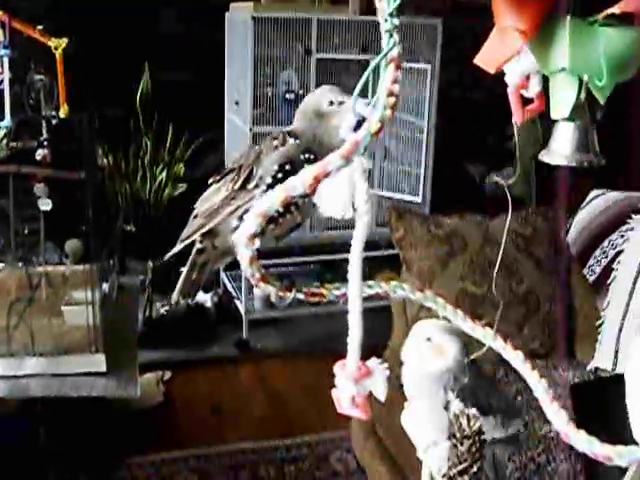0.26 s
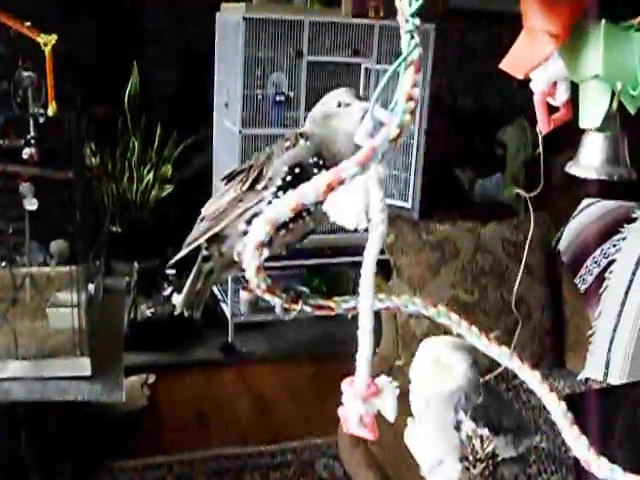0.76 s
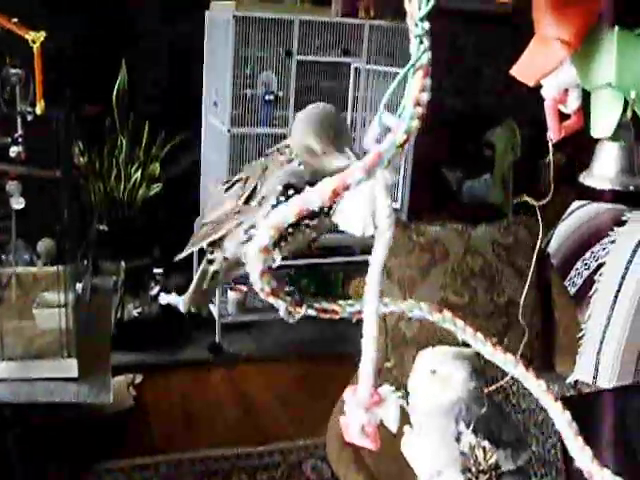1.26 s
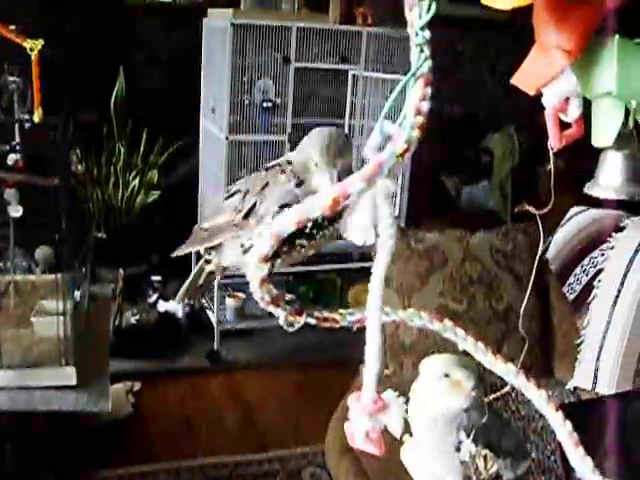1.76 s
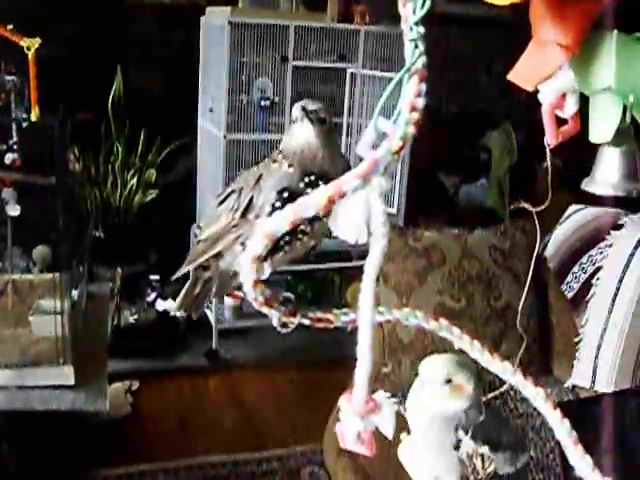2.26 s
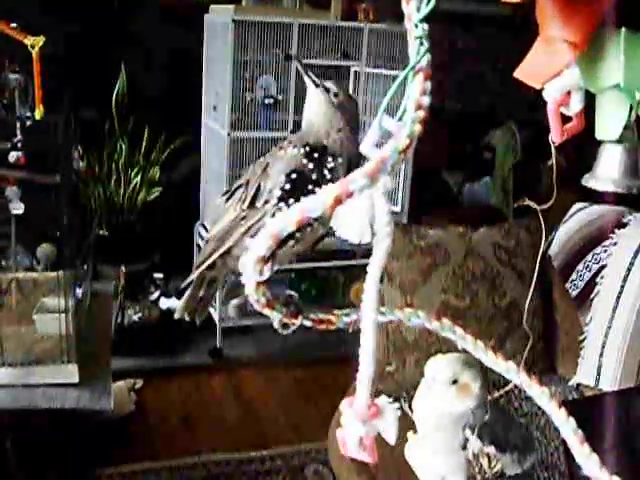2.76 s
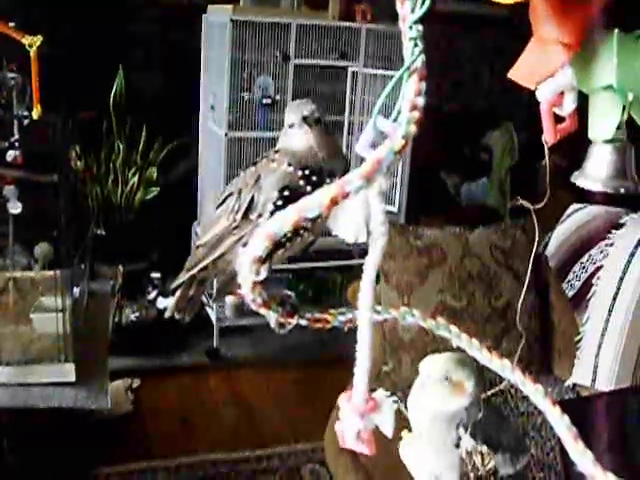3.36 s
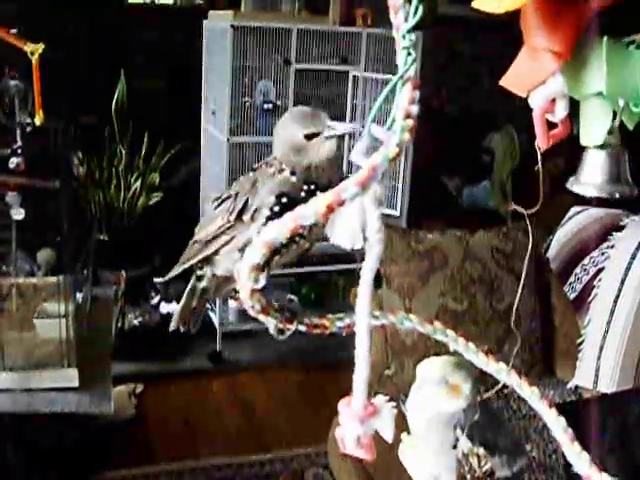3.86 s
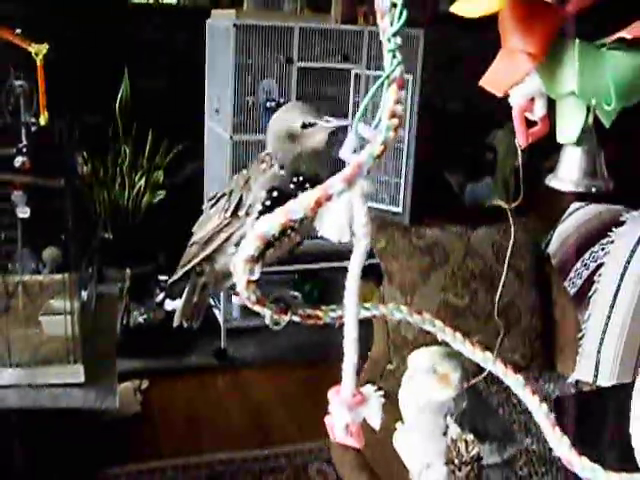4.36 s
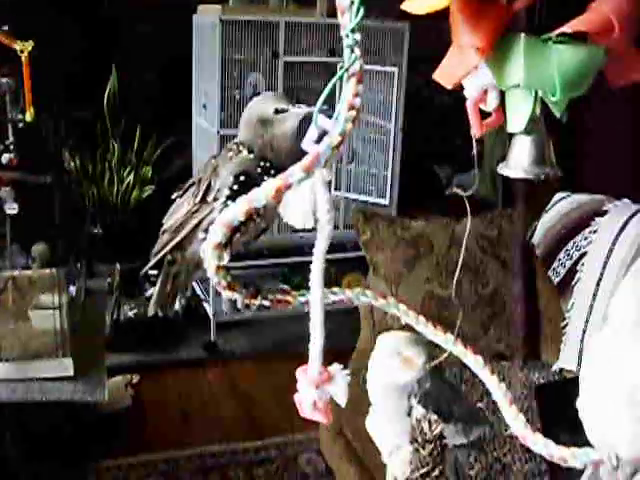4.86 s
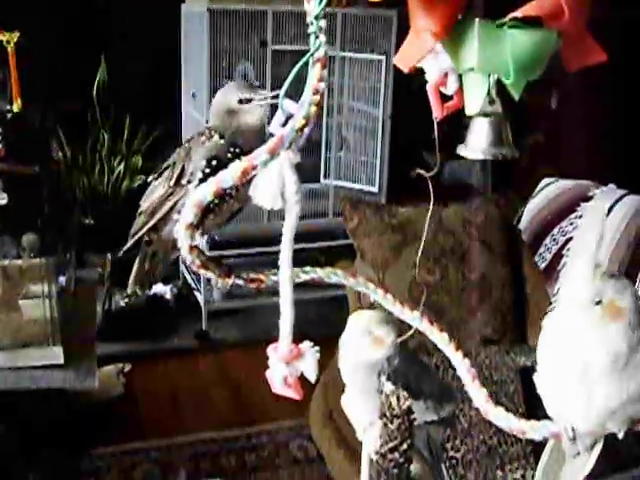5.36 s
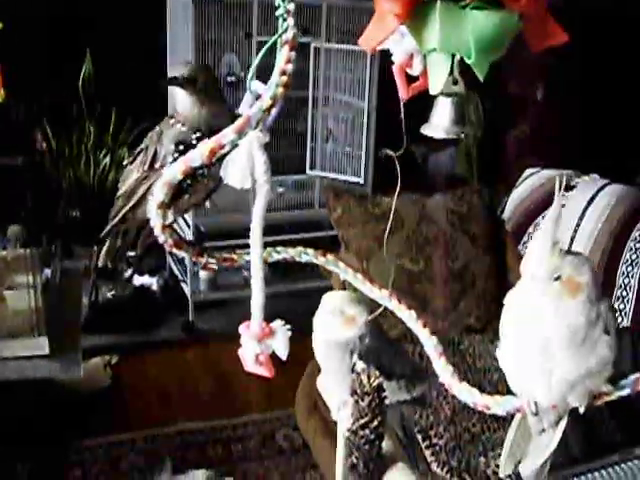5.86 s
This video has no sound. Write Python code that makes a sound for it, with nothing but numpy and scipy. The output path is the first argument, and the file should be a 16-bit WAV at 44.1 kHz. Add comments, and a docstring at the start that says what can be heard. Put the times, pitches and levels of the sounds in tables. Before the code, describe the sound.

In a quiet room, a pet bird gives reedy gliding chirps, thin whistles, scratchy chips and a soft mutter, pausing between bursts.

```python
"""Arched, reedy syllables of a pet starling, then high whistles, dry double chips and a soft mutter.
Each note is a gliding syrinx tone plus overtones, shaped by throat and beak; fast pitch scatter and
leaking air make it hoarse. A quiet living room answers briefly; under it lie one faint ringing tone
near 2.2 kHz, a few soft rustles, a low hush and a thin electronic whine."""
import sys
import numpy as np
from scipy import signal
from scipy.fft import rfft, irfft
from scipy.io import wavfile
from scipy.ndimage import uniform_filter1d

SR = 44100
rng = np.random.default_rng(int(sys.argv[2]) if len(sys.argv) > 2 else 0)


def digitize_waveform(pressure):
    """Quantize a signal to 16-bit integers and store it at the path in sys.argv[1].

    Rows of a 2-D input are taken as channels; values are limited to [-1, 1].
    """
    field = np.atleast_2d(pressure).T
    bounded = np.clip(field, -1, 1)
    quanta = np.round(bounded * 32767).astype(np.int16)
    wavfile.write(sys.argv[1], SR, quanta)


N = 269451
TIME = np.arange(N) / SR

# reedy syllables, one curve each: time_s, pitch_hz, level_db, upper_overtones_db
SYLLABLES = [
    [(0, 2060, -41, -65), (.012, 1910, -58, -91), (.035, 1855, -63.5, -86), (.1, 1950, -73, -98)],
    [(0.172, 958, -62, -89), (0.184, 1078, -50, -75), (0.194, 1126, -54.5, -91), (0.206, 1522, -48, -83),
     (0.25, 1834, -40.5, -65), (0.304, 1920, -39, -76), (0.324, 2120, -43.5, -84),
     (0.344, 2100, -42.5, -90), (0.37, 2370, -46.5, -71), (0.394, 2200, -43, -71),
     (0.408, 1820, -42.5, -72), (0.438, 1498, -48, -73), (0.502, 1387, -47.5, -73), (0.508, 1345, -47, -60),
     (0.522, 910, -53, -75)],
    [(0.662, 990, -56.5, -70), (0.68, 1380, -48.5, -63), (0.702, 1602, -37, -56), (0.724, 1617, -56, -67.5),
     (0.74, 1810, -49, -61), (0.79, 2165, -41, -65), (0.802, 2456, -35.5, -63), (0.814, 2422, -41.5, -69),
     (0.852, 2894, -36, -56), (0.88, 2682, -39.5, -66), (0.914, 2758, -43, -63), (0.932, 2796, -44, -71),
     (0.96, 2436, -41, -63), (0.966, 2205, -40.5, -68), (0.979, 1543, -53, -73)],
    [(1.348, 1360, -60.5, -79), (1.39, 1834, -44, -62.5), (1.418, 1926, -38.5, -61),
     (1.436, 2584, -39, -81), (1.46, 2630, -41, -63), (1.468, 2764, -37.5, -67), (1.5, 2930, -40.5, -66),
     (1.516, 2865, -38.5, -71), (1.526, 2815, -51, -80), (1.545, 2757, -45, -74)],
    [(3.888, 1332, -66, -73), (3.91, 1840, -46.5, -57), (3.928, 1940, -39, -48.5),
     (3.956, 1600, -51.5, -72), (4.004, 1572, -41, -45), (4.016, 2140, -37.5, -55), (4.026, 2683, -43, -80),
     (4.046, 2180, -44, -76), (4.058, 2350, -40, -72), (4.07, 1817, -41.5, -78), (4.08, 1676, -40.5, -58),
     (4.1, 1619, -41.5, -58.5), (4.128, 1672, -40.5, -58.5), (4.168, 1550, -46.5, -68.5),
     (4.18, 1362, -50.5, -72), (4.202, 1458, -46.5, -67), (4.21, 1420, -52.5, -77), (4.228, 1193, -53, -78)],
    [(5.403, 1243, -55, -82), (5.411, 1450, -50, -64), (5.423, 1446, -45.5, -53), (5.437, 1750, -40, -54),
     (5.499, 1845, -38.5, -55.5), (5.519, 2185, -41, -58), (5.535, 2822, -33.5, -68),
     (5.555, 2927, -36, -68), (5.577, 2723, -34, -64.5), (5.599, 2396, -41.5, -82), (5.609, 2087, -37, -64),
     (5.623, 1580, -51.5, -76)],
]
# throat response to overtones: freq_hz, gain_db
THROAT = [(3000, 25), (4700, 5), (6200, -2), (7700, -1), (9300, -1), (10700, -19), (11800, -13.5),
          (13000, -14), (15500, -27)]
# spectrum of air through a loosely closed syrinx: freq_hz, gain_db
AIR = [(600, -7), (1500, 9), (3500, 3), (6000, 7), (9300, -54), (10800, -7), (12000, -25), (15500, -31)]


def starling(waver=0.012, clear=0.0074, hoarse=0.058, scratch=0.055, throb=2.3, shimmer_db=2.5):
    """Pitch and level waver; fast scatter and leaking air make the voice hoarse."""
    # per syllable: pure_above_hz (rising), reedy_below_hz (falling), reedy_octave_db, pure_octave_db,
    # gape_hz
    voicings = [(1500, 1700, 0, -30, 14000), (1390, 1490, 9, -24, 11000), (1990, 1800, 6, -29, 12000),
                (2065, 1700, 1, -26, 9500), (2480, 1930, -0.5, -21, 11500), (2330, 1700, 6, -27.5, 16000)]
    # rasps: centre_s, half_length_s, scatter_ratio
    rasps = [(0.429, 0.011, 0.031), (0.843, 0.0051, 0.025), (0.903, 0.0051, 0.07), (4.026, 0.027, 0.021),
             (4.111, 0.0019, 0.019), (5.512, 0.011, 0.023), (6.065, 0.08, 0.041)]
    slow = waver * wobble(rate_hz=194)
    fast = wobble(rate_hz=3100)
    shake = trills()
    rasp = sum(depth * bump(centre_s, half_s) for centre_s, half_s, depth in rasps)
    scatter = slow + shake + (clear + rasp) * fast
    song = reedy(SYLLABLES, voicings, scatter, gain_db=-0.5, upper_gain_db=-0.5)
    song += doublings(scatter) + whistles(scatter)
    song *= (1 + throb * shake) * from_db(shimmer_db * wobble(rate_hz=84))
    gravel = slow + hoarse * fast
    mutter = reedy(*grunts(), gravel, gain_db=3.5) + twitter(gravel)
    mutter = beak(mutter + air(mutter, gain_db=-10), cutoff_hz=19000)
    chip = chips(slow + scratch * fast)
    chip = beak(chip + air(chip, gain_db=-17), cutoff_hz=12400)
    return song + mutter + chip + tick()


def syrinx(pitch_hz, scatter, gains):
    """Harmonics of one vibrating membrane; scatter bends its pitch."""
    phase = 2 * np.pi * np.cumsum(pitch_hz * (1 + scatter)) / SR
    return np.sqrt(2) * sum(gain * (k * pitch_hz < SR / 2) * np.sin(k * phase)
                            for k, gain in enumerate(gains, 1))


def reedy(syllables, voicings, scatter, gain_db, upper_gain_db=0, harmonics=10, gape_order=7):
    """The throat favours fundamental or octave; a wider beak lets out higher overtones."""
    out = np.zeros(N)
    for rows, (*voicing, gape_hz) in zip(syllables, voicings):
        at, gate, (pitch_hz, effort_db, upper_db) = note(rows)
        first_db, octave_db = effort_db + register(pitch_hz, effort_db, *voicing)
        jump, catch_db = catches(TIME[at])
        upper_hz = np.arange(3, harmonics + 1)[:, None] * pitch_hz * jump
        upper = from_db(at_hz(THROAT, upper_hz)) / np.sqrt(1 + (upper_hz / gape_hz) ** (2 * gape_order))
        upper *= from_db(upper_db + upper_gain_db) / np.linalg.norm(upper, axis=0)
        gains = [from_db(first_db), from_db(octave_db), *upper]
        out[at] += gate * from_db(catch_db) * syrinx(pitch_hz * jump, scatter[at], gains)
    return from_db(gain_db) * out


def register(pitch_hz, effort_db, up_hz, down_hz, reedy_db, pure_db, width_hz=113, octave_per_db=0.24):
    """Shares of fundamental and octave in dB: reedy when low, nearly pure when high."""
    # throat lift of a reedy octave: freq_hz, gain_db
    octave_lift = [(2000, -6), (2900, 4), (3300, 1.5), (3700, -2), (4400, -2)]
    rising = np.arange(len(pitch_hz)) <= np.argmax(pitch_hz)
    break_hz = np.where(rising, up_hz, down_hz)
    pure = .5 + .5 * np.tanh((pitch_hz - break_hz) / (2 * width_hz))
    octave_db = (reedy_db + at_hz(octave_lift, 2 * pitch_hz)) * (1 - pure) + pure_db * pure
    octave_db += octave_per_db * (effort_db - effort_db.mean())
    first_db = -10 * np.log10(1 + from_db(octave_db) ** 2)
    return np.array([first_db, first_db + octave_db])


def trills():
    """Fast pitch swings, each swelling in and out."""
    # trills: start_s, end_s, rate_hz, swing_ratio
    spans = [(0.209, 0.31, 72.4, 0.016), (0.428, 0.523, 70.4, 0.038), (0.752, .84, 99.7, 0.02),
             (1.158, 1.248, 216, 0.046), (3.922, 3.953, 102, 0.011), (3.963, 3.998, 61, 0.03),
             (4.107, 4.161, 70.5, 0.04), (4.163, 4.225, 67.4, 0.14), (5.443, 5.52, 90, 0.015)]
    out = np.zeros(N)
    for start_s, end_s, rate_hz, swing in spans:
        swell = np.sqrt(np.clip(4 * (TIME - start_s) * (end_s - TIME) / (end_s - start_s) ** 2, 0, 1))
        out += swing * swell * np.sin(2 * np.pi * rate_hz * (TIME - start_s))
    return out


def catches(time_s):
    """The voice catches for an instant: pitch factor and gain in dB."""
    # catches: centre_s, half_length_s, jump_ratio, gain_db
    events = [(0.275, 0.0059, -.03, -18), (0.306, 0.0061, -.04, -8), (0.767, .005, -.02, -7),
              (0.779, 0.0042, 0.017, 2.5), (0.9, 0.0061, 0, -4), (1.457, 0.0042, -0.017, -11),
              (4.101, 0.00351, 0.237, 3.5), (5.422, 0.0048, -0.023, 1.5), (5.509, 0.0065, 0, -8.5)]
    centre_s, half_s, jump, gain_db = np.transpose(events)
    bumps = np.exp(-np.minimum(((time_s[:, None] - centre_s) / half_s) ** 2, 20))
    return 1 + bumps @ jump, bumps @ gain_db


def doublings(scatter):
    """The membrane skips into half pitch, adding tones between a syllable's harmonics."""
    # period doublings: centre_s, length_s, level_db
    skips = [(0.846, 0.0037, -53), (0.908, 0.032, -56.5)]
    # added tones: pitch_multiple, gain_db
    half_tones = [(1.5, -7), (2.5, 0), (3.5, -3)]
    out = np.zeros(N)
    times_s, pitches_hz = np.concatenate(SYLLABLES).T[:2]
    pitch_hz = np.interp(TIME, times_s, pitches_hz)
    for centre_s, length_s, level_db in skips:
        at, gate, (swell_db,) = note(np.transpose(arch(centre_s, length_s, edge_db=-5)))
        for multiple, gain_db in half_tones:
            gain = from_db(level_db + swell_db + gain_db)
            out[at] += gate * syrinx(multiple * pitch_hz[at], scatter[at], [gain])
    return out


def whistles(scatter, gain_db=-1.5, octave_db=-8, third_db=-23, full_effort_db=-41):
    """Nearly pure high tones; the octave shows when pushed and where the throat passes it."""
    # whistles, one curve each: time_s, pitch_hz, level_db
    curves = [
        [(1.061, 7782, -76), (1.067, 7098, -52.5), (1.077, 5900, -50), (1.105, 5240, -44.5), (1.115, 4510, -43),
         (1.139, 4470, -39.5), (1.149, 4274, -43), (1.167, 4700, -40), (1.199, 6000, -36.5),
         (1.227, 6357, -37.5), (1.245, 6182, -50), (1.255, 5420, -51), (1.263, 4390, -42), (1.268, 4400, -61)],
        [(4.852, 8040, -68), (4.872, 8500, -54.5), (4.89, 7820, -58), (4.912, 7420, -65), (4.935, 7870, -52),
         (4.952, 5950, -75), (4.967, 5090, -67)],
    ]
    out = np.zeros(N)
    for rows in curves + slurs():
        at, gate, (pitch_hz, first_db) = note(rows)
        slack_db = np.minimum(first_db - full_effort_db, 0)
        second_db = first_db + octave_db + at_hz(THROAT, 2 * pitch_hz) + slack_db
        gains = from_db([first_db, second_db, second_db + third_db])
        out[at] += gate * syrinx(pitch_hz, scatter[at], gains)
    return from_db(gain_db) * out


def slurs():
    """Curves of short glides, some from the other side of the syrinx."""
    # slurs: centre_s, length_s, start_hz, end_hz, level_db
    glides = [(0.856, 0.018, 5200, 3380, -54), (0.9, .018, 2994, 4100, -49), (4.88, 0.03, 5370, 4840, -69),
              (6.028, 0.016, 4000, 4460, -76), (6.05, 0.022, 6110, 6950, -53.5),
              (6.097, 0.041, 5330, 7000, -60)]
    curves = []
    for centre_s, length_s, start_hz, end_hz, level_db in glides:
        times_s, swell_db = arch(centre_s, length_s, edge_db=-1.5)
        curves.append(np.transpose([times_s, np.geomspace(start_hz, end_hz, 3), level_db + swell_db]))
    return curves


def chips(scatter, harmonics_db=(0, -18, -32, -35)):
    """Pairs of quick scratchy notes, each flicking upward."""
    # the two notes, one curve each: offset_s, pitch_hz, level_db
    curves = [
        [(0, 2680, -60), (.006, 3167, -55.5), (.011, 3690, -55), (.015, 3670, -61.5), (.019, 3890, -66),
         (.026, 3670, -55.5)],
        [(.044, 3167, -46.5), (.049, 3116, -46.5), (.055, 3067, -55), (.059, 3590, -56), (.062, 4020, -52)],
    ]
    # double chips: start_s, first_gain_db, second_gain_db, pitch_factor
    pairs = [(1.838, 7.5, 3.5, 1.014), (3.568, 5, 2.5, 1.008), (4.726, 2.5, 2.5, 1.01)]
    out = np.zeros(N)
    for start_s, *gains_db, pitch_factor in pairs:
        for rows, gain_db in zip(curves, gains_db):
            at, gate, (pitch_hz, level_db) = note(rows, start_s, fade_s=.006)
            gains = [from_db(level_db + gain_db + db) for db in harmonics_db]
            out[at] += gate * syrinx(pitch_hz * pitch_factor, scatter[at], gains)
    return out


def grunts(break_hz=3000, pure_db=-20, gape_hz=10350):
    """Curves and voicings of the mutter: one pitch bend under one swell per grunt."""
    # grunts: centre_s, length_s, middle_hz, end_bend_ratio, level_db, octave_rel_db, upper_rel_db
    mutter = [(4.375, 0.024, 984, 0.29, -56.5, 14, -6), (4.385, .016, 1507, -0.23, -55, 1, -6),
              (4.402, 0.0089, 1625, -0.047, -53, -5, -8), (4.413, 0.014, 1650, -0.18, -51.5, -6.5, -1.5),
              (4.43, .014, 1640, -.15, -58, -3, -4), (4.438, .016, 1496, -.2, -60, -2, -7),
              (4.454, .014, 1520, -.22, -59, -1, -4.5), (4.474, 0.042, 1772, -0.28, -55, -14, -16),
              (4.537, 0.037, 1610, -0.33, -62.5, -4, -21), (4.561, 0.051, 1880, -0.52, -57.5, -8, -22),
              (4.641, 0.048, 2206, -0.36, -55.5, 2, -12.5)]
    curves, voicings = [], []
    for centre_s, length_s, middle_hz, bend, level_db, octave_db, upper_db in mutter:
        times_s, swell_db = arch(centre_s, length_s, edge_db=-10.5)
        pitch_hz = middle_hz * (1 + bend * np.array([1, 0, 1]))
        effort_db = level_db + swell_db
        curves.append(np.transpose([times_s, pitch_hz, effort_db, effort_db + upper_db]))
        voicings.append((break_hz, break_hz, octave_db, pure_db, gape_hz))
    return curves, voicings


def twitter(scatter, harmonics_db=(-30, -11, -7, 0, -5, -10)):
    """Faint hoarse voice; the throat picks out harmonics around the fourth."""
    # twitter: time_s, pitch_hz, level_db
    curve = [(5.93, 1650, -74), (5.95, 1800, -77), (5.975, 1420, -72), (5.987, 1500, -64.5),
             (5.998, 1740, -66), (6.012, 1450, -71), (6.022, 1580, -68), (6.036, 1400, -73)]
    out = np.zeros(N)
    at, gate, (pitch_hz, level_db) = note(curve)
    out[at] = gate * syrinx(pitch_hz, scatter[at], [from_db(level_db + db) for db in harmonics_db])
    return out


def air(voice, gain_db, window_samples=90):
    """Turbulent hiss that follows the voice's loudness."""
    loudness = np.sqrt(np.abs(uniform_filter1d(voice ** 2, window_samples)))
    return from_db(gain_db) * loudness * hiss(AIR)


def beak(x, cutoff_hz):
    """The half-closed beak muffles the very top."""
    return signal.sosfilt(signal.butter(4, cutoff_hz, fs=SR, output="sos"), x)


def tick(level_db=-49):
    """Tiny dry puff of hiss within the loud whistle."""
    return from_db(level_db) * bump(centre_s=1.209, half_s=0.00099) * hiss(AIR)


def living_room(x, build_up_s=0.0021, tail_samples=22050, bands=8):
    """A few reflections, then a diffuse tail that dies sooner in the treble."""
    # reflections off cage, furniture and walls: delay_s, gain_db
    echoes = [(.0031, -85), (.0068, -12), (0.0103, -16.5), (0.0139, -17.5)]
    # reverberation: freq_hz, t60_s, gain_db
    reverb = [(980, 0.41, -16.5), (2380, 0.3, -8.5), (5170, 0.26, -8), (8300, 0.29, -8.5),
              (14900, 0.22, -25)]
    time_s, tail = TIME[:tail_samples], np.zeros(tail_samples)
    onset = 1 - np.exp(-(time_s / build_up_s) ** 2)
    edges_hz = np.geomspace(700, 17000, bands + 1)
    for low_hz, high_hz in zip(edges_hz, edges_hz[1:]):
        centre_hz = np.sqrt(low_hz * high_hz)
        band = noise(lambda hz: (hz >= low_hz) & (hz < high_hz), tail_samples)
        band *= onset * np.exp(-np.log(1000) * time_s / at_hz(reverb, centre_hz))
        gain = np.sqrt(2 * (high_hz - low_hz) / SR) * from_db(at_hz(reverb, centre_hz, column=2))
        tail += gain * band / np.linalg.norm(band)
    early = sum(from_db(db) * np.interp(TIME - delay_s, TIME, x, left=0) for delay_s, db in echoes)
    return early + signal.fftconvolve(x, tail)[:N]


def ring_and_rustles():
    """Swells of band noise: a faint narrow ringing tone near 2.2 kHz, then soft rustles."""
    # ringing tone (first row), then rustles: centre_s, half_length_s, centre_hz, width_hz, level_db
    swells = [(1.334, 0.096, 2190, 250, -68), (1.723, 0.024, 1390, 500, -66), (2.52, 0.18, 2190, 1200, -79),
              (2.973, .1, 5170, 1800, -78), (5.16, 0.078, 4130, 3000, -72)]
    out = np.zeros(N)
    for centre_s, half_s, centre_hz, width_hz, level_db in swells:
        band = noise(lambda hz: np.exp(-2 * ((hz - centre_hz) / width_hz) ** 2))
        out += from_db(level_db) * bump(centre_s, half_s) * band
    return out


def hush(level_db=-63):
    """Steady low room noise."""
    # hush spectrum: freq_hz, gain_db
    spectrum = [(15, -35), (25, -1), (64, 1.5), (274, -4), (614, -10), (703, -8.5), (782, -11), (919, -9.5),
                (1140, -12.5), (1950, -15), (6730, -28.5), (7700, -26), (8350, -31.5), (10900, -35),
                (15500, -36.5)]
    return from_db(level_db) * hiss(spectrum)


def whine(pitch_hz=7696, wander_hz=45, level_db=-78, octave_db=-18):
    """Electronic whine, even in level, unsteady in pitch."""
    phase = 2 * np.pi * np.cumsum(pitch_hz + wander_hz * wobble(rate_hz=102.6)) / SR
    return from_db(level_db) * np.sqrt(2) * (np.sin(phase) + from_db(octave_db) * np.sin(2 * phase))


def note(rows, start_s=0, fade_s=.003):
    """Sample indices, soft-edged gate and control curves of a note."""
    times_s, *columns = np.transpose(rows)
    times_s = times_s + start_s
    at = np.flatnonzero((TIME > times_s[0] - fade_s / 2) & (TIME < times_s[-1] + fade_s / 2))
    inside_s = np.minimum(TIME[at] - times_s[0], times_s[-1] - TIME[at])
    gate = np.sin(np.clip(inside_s / fade_s + .5, 0, 1) * np.pi / 2) ** 2
    return at, gate, [np.interp(TIME[at], times_s, column) for column in columns]


def arch(centre_s, length_s, edge_db):
    """Times and levels of a three-point swell."""
    return centre_s + length_s * np.array([-.5, 0, .5]), edge_db * np.array([1, 0, 1])


def bump(centre_s, half_s):
    """Gaussian envelope."""
    return np.exp(-((TIME - centre_s) / half_s) ** 2)


def noise(gain_at, samples=N):
    """Unit-rms noise shaped by gain_at(hz)."""
    gains = gain_at(np.fft.rfftfreq(samples, 1 / SR))
    shaped = irfft(rfft(rng.standard_normal(samples)) * gains, samples)
    return shaped / np.sqrt(np.mean(shaped ** 2) + 1e-20)


def hiss(spectrum):
    """Unit-rms noise shaped by a table."""
    return noise(lambda hz: from_db(at_hz(spectrum, hz)))


def wobble(rate_hz):
    """Random motion, rolling off above rate_hz."""
    return noise(lambda hz: 1 / (1 + (hz / rate_hz) ** 2))


def at_hz(table, hz, column=1):
    """Table lookup on a log-frequency axis."""
    table = np.array(table)
    return np.interp(np.log(np.maximum(hz, 1)), np.log(table[:, 0]), table[:, column])


def from_db(db):
    """Decibels to gain."""
    return 10 ** (np.asarray(db) / 20)


def scene():
    """Bird, room and background, in mono."""
    bird = starling()
    return (bird + living_room(bird) + ring_and_rustles() + hush() + whine())[None]


def record(dry, cutoff_hz=15700):
    """Steep low-pass."""
    return signal.sosfilt(signal.ellip(10, .1, 70, cutoff_hz, fs=SR, output="sos"), dry)


dry = scene()
out = record(dry)
digitize_waveform(out)
```